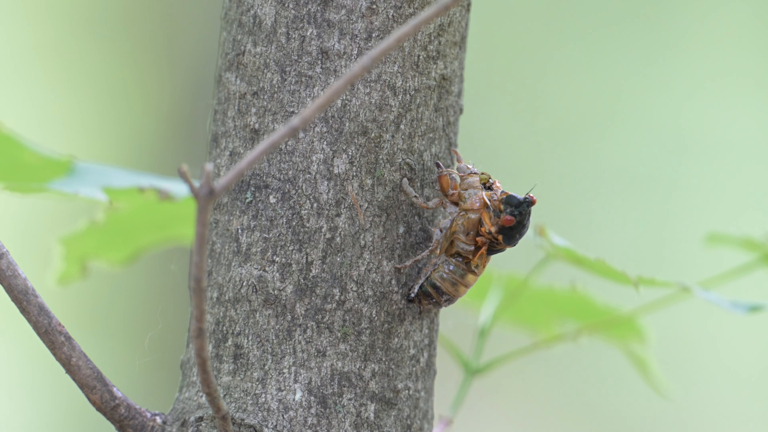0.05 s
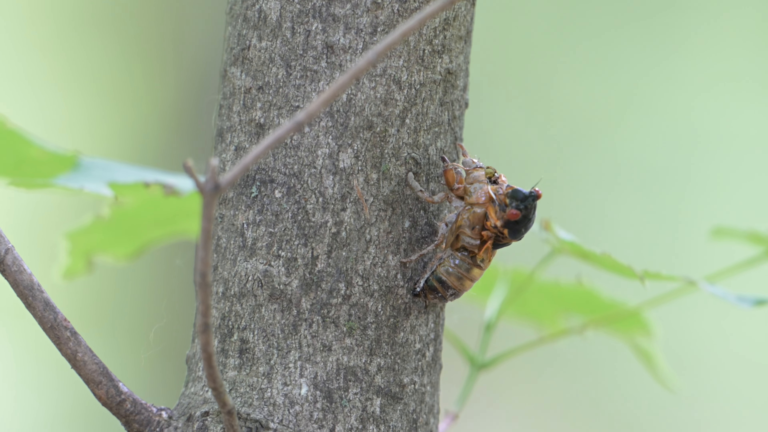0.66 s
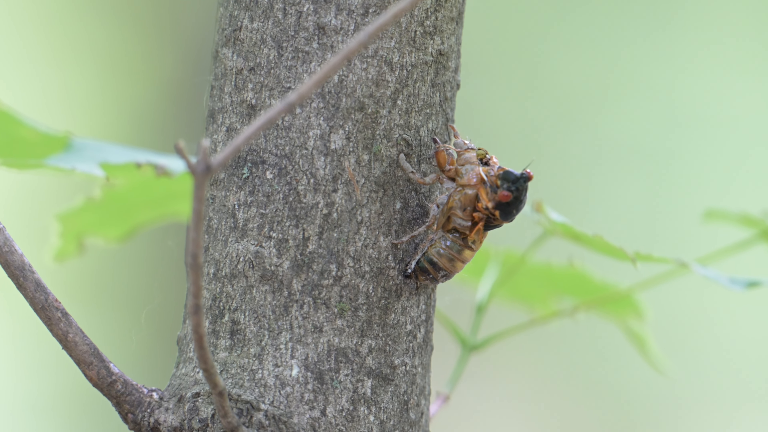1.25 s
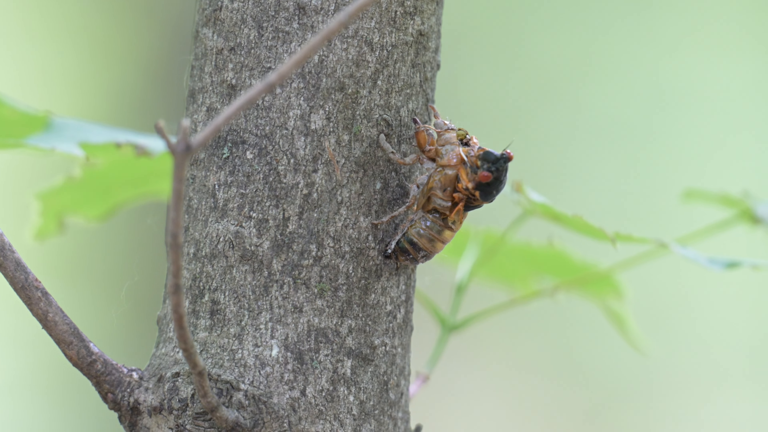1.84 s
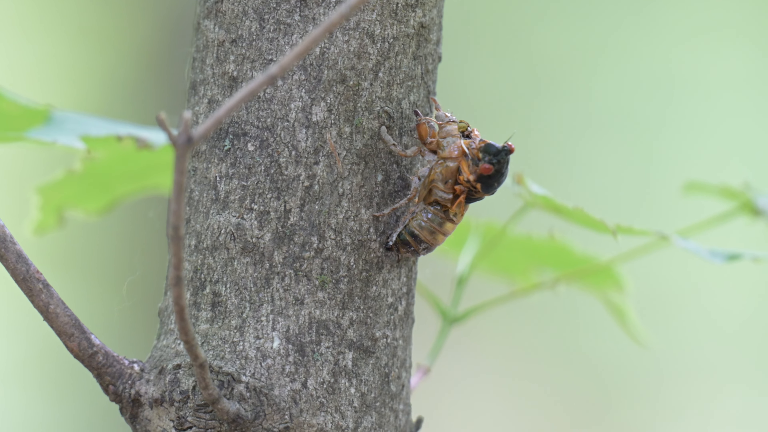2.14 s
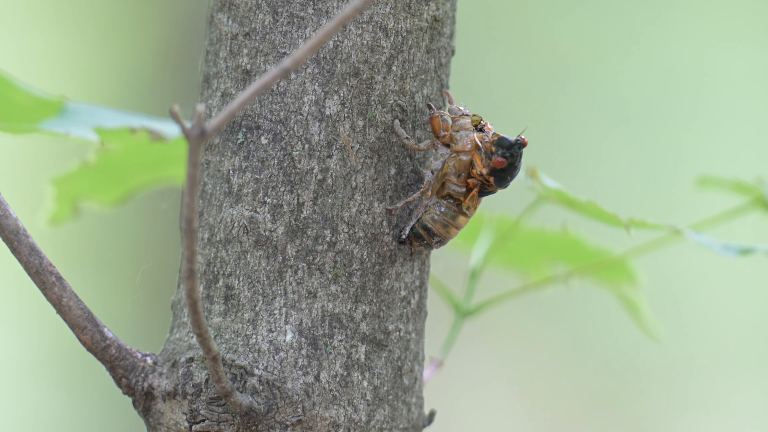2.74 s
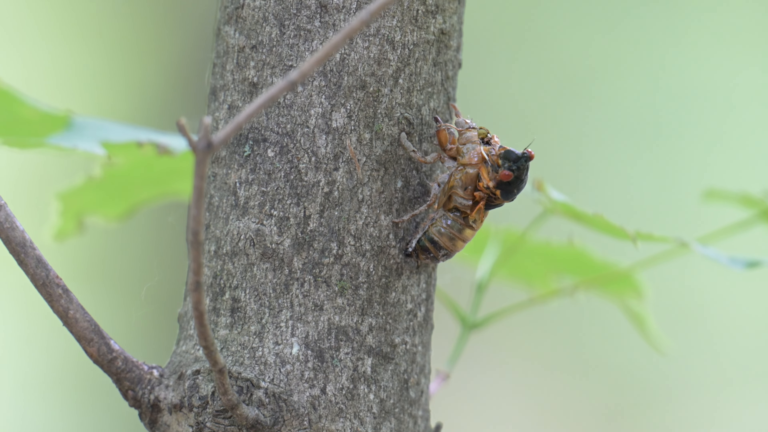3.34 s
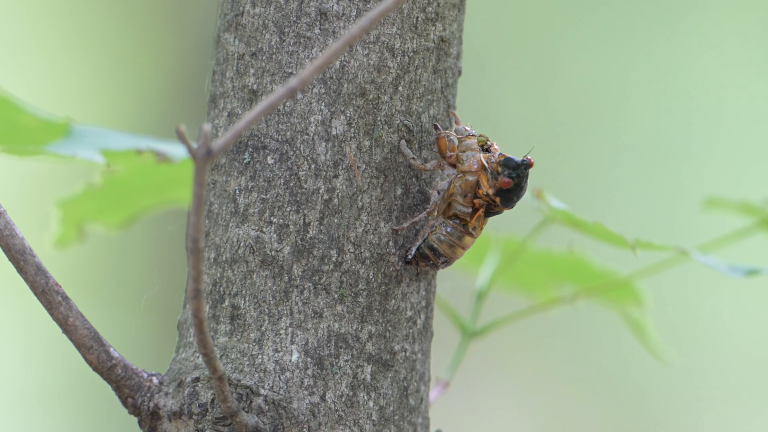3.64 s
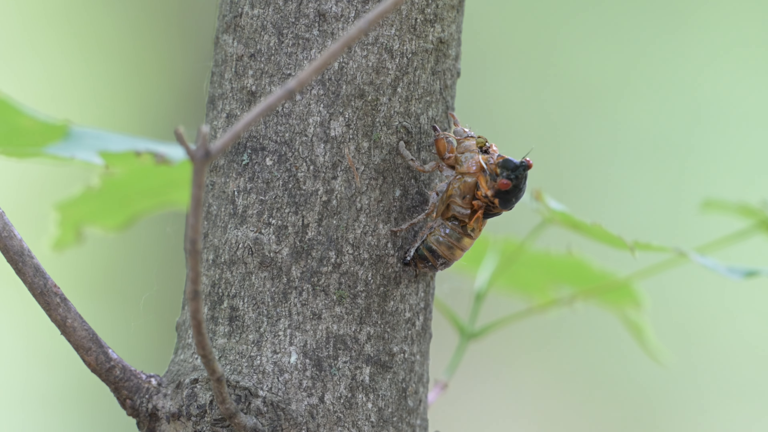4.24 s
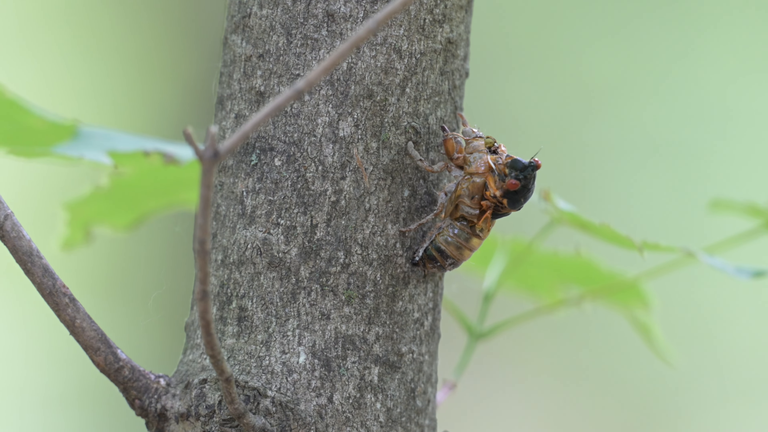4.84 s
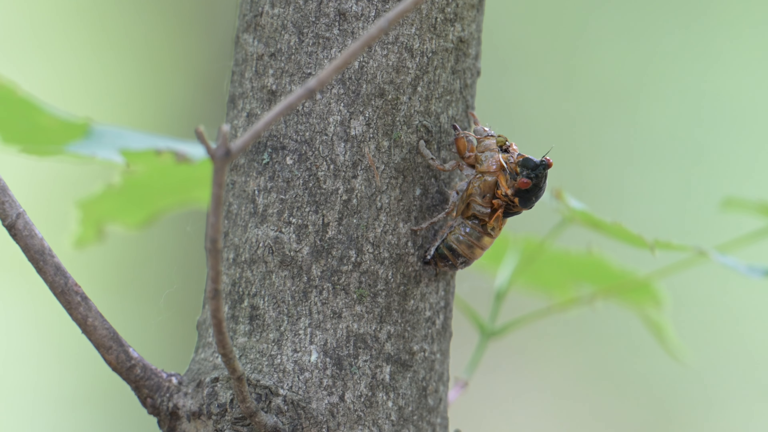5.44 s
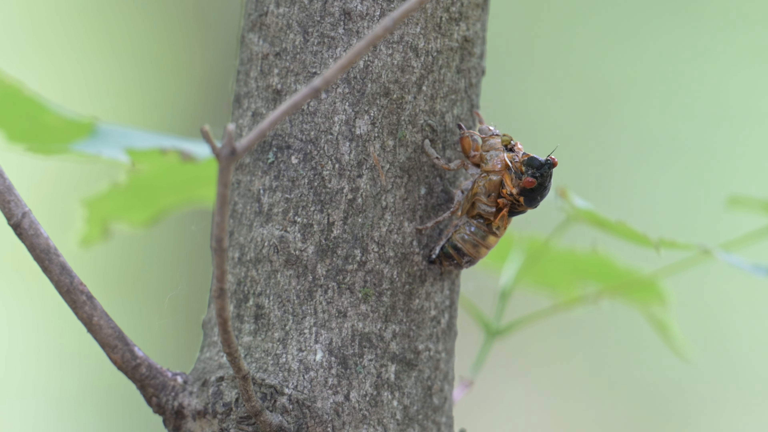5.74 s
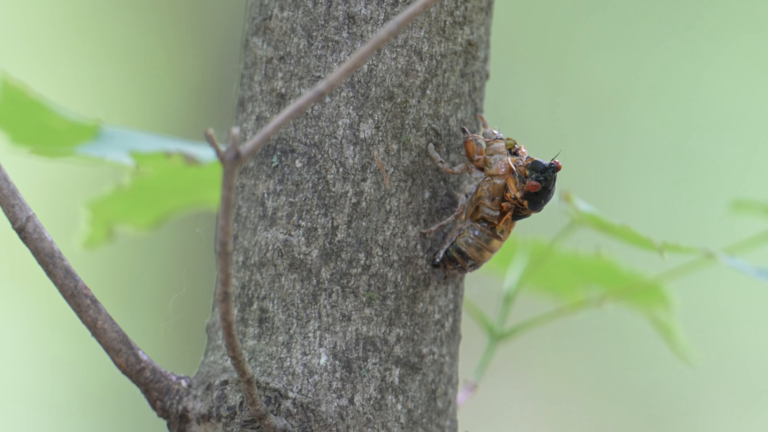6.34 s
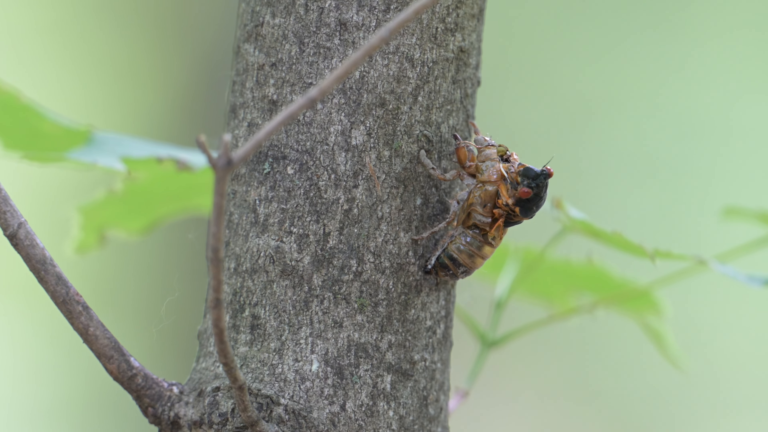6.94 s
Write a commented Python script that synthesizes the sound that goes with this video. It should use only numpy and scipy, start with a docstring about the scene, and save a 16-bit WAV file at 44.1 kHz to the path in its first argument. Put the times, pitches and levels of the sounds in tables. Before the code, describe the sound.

Countless cicadas blend into a loud, wavering hum among trees, with faint high birdsong partway through and a very faint distant engine.

```python
"""From the start, thousands of periodical cicadas blend into one wavering drone in summer woodland,
over a distant engine's low hum and faint, scattered hoots. From 1.6 s to 5 s a small songbird whistles
one phrase of repeated chirps and trills, scattered by the trees. At 1.9 s a low rumble enters and stays.
The drone runs to the end. The microphone is nearly mono; its limiter holds down the drone's crests."""
import sys
import numpy as np
from scipy import signal
from scipy.fft import rfft, irfft, next_fast_len
from scipy.io import wavfile
from scipy.ndimage import uniform_filter1d, minimum_filter1d, map_coordinates

SR = 44100
rng = np.random.default_rng(int(sys.argv[2]) if len(sys.argv) > 2 else 0)


def bounce(signal):
    """Save signal as a 16-bit WAV file at the path given by the first command-line argument."""
    frames = np.transpose(np.atleast_2d(signal))
    limited = np.clip(frames, -1, 1)
    pcm = np.round(limited * 32767).astype(np.int16)
    wavfile.write(sys.argv[1], SR, pcm)


N = 317079

# massed song, held notes at the crest, falling ends in the shelf below: f/Hz, relative density/dB
DRONE_SPECTRUM = [(600, -54.5), (770, -33.5), (870, -19), (1070, -19), (1190, -8.5), (1260, -6),
                  (1335, 0.5), (1380, -1), (1460, -9.5), (1590, -20), (1690, -24), (1850, -35.5),
                  (2300, -44.5), (3200, -72.5)]
# drone's brief, irregular rises and dips in loudness: t/s, level/dB
DRONE_LEVEL = [(0, -16.6), (.3, -17), (.4, -18.8), (.49, -14.2), (.6, -18.2), (1.17, -16.8), (1.6, -18),
               (1.7, -16.7), (3.3, -16.8), (5.1, -17), (5.18, -15.6), (5.86, -18.2), (5.99, -15),
               (6.3, -17.8), (6.54, -15.2), (6.65, -18.8), (6.86, -15.6), (7.19, -18)]
# swarm's rasp, dulled by leaves: f/Hz, relative density/dB
RASP_SPECTRUM = [(700, -21), (1700, 5), (2250, 1), (2720, 0.5), (3200, -7), (3550, -7), (3920, -0.5),
                 (4700, -7), (5800, -12.5), (7500, -16.5), (8900, -16), (10700, -24), (15500, -29)]

def cicadas(near_db=-11, sway_db=.7, sways_per_s=11, rasp_db=-40.7, rasp_sway_db=.6):
    """Far swarm and nearer singers beat together in one swaying drone, a dry rasp above it."""
    level_db, = curves(DRONE_LEVEL)
    drone = steady(wash(DRONE_SPECTRUM) + amp(near_db) * near_cicadas())
    drone *= amp(level_db + sway_db * wobble(sways_per_s))
    rasp = amp(rasp_db + rasp_sway_db * wobble(4)) * wash(RASP_SPECTRUM)
    return drone + rasp


def near_cicadas(count=14, pitch_hz=1345, spread=.025, phrase_s=3.3, fall=.33):
    """Each holds a note, slurs down as its abdomen drops, rests and restarts."""
    t, voices = np.arange(N) / SR, np.zeros(N)
    for start, pace, detune in rng.standard_normal((count, 3)):
        progress = (start + t / (phrase_s * amp(pace))) % 1
        slur = np.clip((progress - .72) / .16, 0, 1)
        effort = np.clip(progress * 10, 0, 1) * (1 - slur) ** 2
        voices += effort * tone(pitch_hz * (1 + spread * detune) * (1 - fall * slur))
    return unit(woods(voices))


# bird's phrase: t/s, syllable, relative level/dB, pitch ratio
BIRD_PHRASE = [(1.56, "peep", 0, 1), (1.681, "swoop", -4, 1.028), (1.914, "swoop", -1, 1),
               (2.142, "swoop", 2.3, 1), (2.401, "cascade", 0, 1), (2.698, "cascade", 0, 1.005),
               (2.998, "cascade", -1, 1.005), (3.327, "flick", .5, 1), (3.502, "flick", -1.5, 1),
               (3.693, "flick", 0, 1), (3.845, "trill", 0, 1), (4.147, "zip", 0, 1),
               (4.153, "trill", -1.5, 1), (4.478, "seesaw", -1, 1), (4.708, "seesaw", .5, 1),
               (4.957, "seesaw", .5, 1)]
# path gains: direct/dB, off nearby leaves/dB, from deeper woods/dB
PATH_GAINS_DB = (-1.1, -7, -7.8)

def bird():
    """One phrase, most syllables sung two or three times, heard direct and off the trees."""
    song = np.zeros(N)
    for start_s, syllable, accent_db, ratio in BIRD_PHRASE:
        for delay_s, length_s, *bend_hz, db in notes(syllable):
            note = whistle(length_s, np.multiply(bend_hz, ratio))
            onset = round((start_s + delay_s) * SR)
            song[onset:][:len(note)] += amp(accent_db + db) * note
    direct, near, far = amp(PATH_GAINS_DB)
    return direct * song + near * leaves(song) + far * woods(song)


# notes per syllable: delay/s, length/s, start f/Hz, middle f/Hz, end f/Hz, level/dB
SYLLABLE_NOTES = { "peep": [(0, .026, 5260, 5200, 5170, -47)], "swoop": [(0, .049, 5920, 6090, 6110, -39),
                  (.071, .02, 7800, 6400, 5650, -40), (.083, .031, 5950, 5280, 4750, -36.5),
                  (.131, .026, 4170, 5100, 5670, -36.5)], "cascade": [(0, .032, 8000, 7600, 7200, -52),
                  (.028, .028, 7250, 6600, 6400, -38.5)], "flick": [(0, .044, 4850, 4300, 3650, -39.2),
                  (.059, .017, 5400, 5750, 7550, -36.5)], "trill": [(0, .055, 6950, 6850, 6550, -48.5),
                  (.05, .035, 6450, 5820, 5650, -38)], "zip": [(0, .013, 9800, 7200, 5460, -40)],
                  "seesaw": [(0, .033, 6720, 6400, 6550, -43.8), (.043, .032, 4350, 4850, 5350, -40.7),
                  (.067, .021, 5300, 4550, 3700, -42.7)]}
# closing runs: same six columns, period/s, pitch ratio per note, loudest index, fade per note/dB
SYLLABLE_RUNS = {"cascade": (.053, .019, 5100, 5600, 6050, -35, .023, .89, 0, 2.9),
                 "trill": (.099, .02, 3750, 5250, 3950, -35.2, .03, 1, 2.3, 3)}

def notes(syllable, run_count=5):
    """A syllable's opening notes, then any run: one note repeated evenly, fading either side of a peak."""
    rows = list(SYLLABLE_NOTES[syllable])
    if syllable in SYLLABLE_RUNS:
        delay_s, length_s, *bend_hz, peak_db, period_s, step, loudest, fade_db = SYLLABLE_RUNS[syllable]
        for k in range(run_count):
            db = peak_db - fade_db * abs(k - loudest)
            rows.append((delay_s + k * period_s, length_s, *np.multiply(bend_hz, step ** k), db))
    return rows


def whistle(length_s, bend_hz, waver=.007, pointed=.7):
    """A pure note swells, bends through three pitches in a pointed arc and fades."""
    progress = np.linspace(0, 1, max(int(length_s * SR), 16))
    arc_hz = np.polyval(np.polyfit([0, .5, 1], bend_hz, 2), progress)
    corner_hz = np.interp(progress, [0, .5, 1], bend_hz)
    pitch_hz = (1 - pointed) * arc_hz + pointed * corner_hz
    flutter = 1 + waver * np.interp(progress, np.linspace(0, 1, 6), rng.standard_normal(6))
    swell = np.abs(np.sin(np.pi * progress)) ** .6
    return swell * tone(pitch_hz * flutter)


def leaves(x, t60_s=.19):
    """Nearby foliage smears a sound into a short diffuse halo."""
    t = np.arange(SR // 4) / SR
    tail = rng.standard_normal(len(t)) * amp(-60 * t / t60_s)
    return signal.fftconvolve(x, tail / np.linalg.norm(tail))[:N]


# woodland decay: f/Hz, t60/s
WOODS_DECAY = [(300, 0.51), (1400, 0.67), (5000, 1.4), (10000, 0.17)]

def woods(x):
    """Trunks and canopy scatter a sound into a tail, longest near 5 kHz; the top treble dies first."""
    hz, t, noise = signal.stft(rng.standard_normal(SR), SR, nperseg=256)
    decay = amp(-60 * t / along(WOODS_DECAY, hz)[:, None])
    tail = signal.istft(noise * decay, SR, nperseg=256)[1]
    return signal.fftconvolve(x, tail / np.linalg.norm(tail))[:N]


# engine tones: t/s, f/Hz, fundamental level/dB, third harmonic level/dB
ENGINE_TONES = [(0, 148, -63, -70), (.7, 149, -65, -58.5), (1.45, 152.5, -54.5, -61.5),
                (1.7, 153, -66, -72), (2.9, 157, -62, -69), (3.3, 157, -55, -61), (4.5, 156.5, -54.5, -70),
                (5.25, 157, -57, -74), (5.6, 156.5, -58, -58), (6.3, 157.5, -55.5, -67),
                (7.19, 155, -57, -75)]

def engine(waver_hz=1, fading_db=.6):
    """A distant engine speeds up slightly; its two tones fade and return."""
    hz, first_db, third_db = curves(ENGINE_TONES)
    hz += waver_hz * wobble(8)
    first = amp(first_db + fading_db * wobble(3.1)) * tone(hz)
    third = amp(third_db + fading_db * wobble(3.1)) * tone(3 * hz)
    return first + third


def rumble(pitch_hz=70, level_db=-66, start_s=1.9, rise_s=.25, fading_db=3, waver_hz=2.5):
    """Far machinery's low rumble comes in and stays."""
    rise = np.clip((np.arange(N) / SR - start_s) / rise_s, 0, 1)
    return rise * amp(level_db + fading_db * wobble(3)) * tone(pitch_hz + waver_hz * wobble(6))


# far machinery: f/Hz, level/dB
MACHINE_HUMS = [(91, -64.5), (102, -69), (309, -69)]

def machinery(fading_db=2, waver_hz=2):
    """Far machines hum throughout, wavering slightly in level and pitch."""
    return sum(amp(db + fading_db * wobble(2)) * tone(hz + waver_hz * wobble(7))
               for hz, db in MACHINE_HUMS)


# faint hoots: t/s, length/s, f/Hz, level/dB
FAR_HOOTS = [(.4, .8, 423, -63), (.85, .35, 612, -59.5), (3.12, .61, 350, -56), (3.15, .31, 368, -57),
             (4.25, .3, 350, -55.5), (6.2, .98, 203, -61.5)]

def hoots(waver_hz=6, echo_db=-10):
    """Soft low tones from far off, blurred by the trees."""
    t, sound = np.arange(N) / SR, np.zeros(N)
    for start_s, length_s, hz, db in FAR_HOOTS:
        progress = np.clip((t - start_s) / length_s, 0, 1)
        sound += amp(db) * np.sin(np.pi * progress) * tone(hz + waver_hz * wobble(25))
    return sound + amp(echo_db) * woods(sound)


# far traffic and air: f/Hz, relative density/dB
AIR_SPECTRUM = [(25, -27), (40, -19), (62, -6), (95, -3), (125, 1.2), (250, 1.5), (450, 2.2), (650, 2),
                (1500, -5), (5000, -42)]

def air(level_db=-50):
    """Far traffic and air blend into a steady murmur."""
    return amp(level_db) * wash(AIR_SPECTRUM)


def amp(db):
    """Decibels to gain."""
    return 10 ** (np.asarray(db) / 20)


def unit(x):
    """x at rms 1."""
    return x / np.sqrt(np.mean(x ** 2) + 1e-20)


def along(points, hz):
    """(f/Hz, value) points read on a log axis."""
    knots_hz, values = np.transpose(points)
    return np.interp(np.log(hz + 1), np.log(knots_hz + 1), values)


def curves(rows):
    """One value per sample for each column after t/s."""
    times_s, *columns = np.transpose(rows)
    return [np.interp(np.arange(N) / SR, times_s, column) for column in columns]


def wobble(knots_per_s):
    """Smooth random curve."""
    knots = rng.standard_normal(int(N * knots_per_s / SR) + 4)
    return map_coordinates(knots, [np.arange(N) * knots_per_s / SR])


def filtered(x, response):
    """x through a gain given as a function of f/Hz."""
    size = next_fast_len(N + SR // 2)
    return irfft(rfft(x, size) * response(np.fft.rfftfreq(size, 1 / SR)), size)[..., :N]


def wash(spectrum):
    """Noise of rms 1 with the given spectral shape."""
    return unit(filtered(rng.standard_normal(N), lambda hz: amp(along(spectrum, hz))))


def tone(hz):
    """Sine of rms 1 on a pitch curve."""
    return np.sqrt(2) * np.sin(2 * np.pi * (np.cumsum(hz) / SR + rng.random()))


def steady(x, window_s=.14):
    """Evens out slow level drift, keeps fast beating."""
    size = int(window_s * SR)
    power = uniform_filter1d(uniform_filter1d(x ** 2, size), size)
    return x / np.sqrt(np.abs(power) + 1e-12)


# stereo spread: f/Hz, side gain/dB
SIDE_GAIN = [(600, -66), (1000, -57), (1350, -31.5), (1700, -49.5), (2400, -62.5), (4400, -37.5),
             (8000, -23)]

def scene(bird_width_db=9):
    """Swarm and bird echoes surround the microphone with a trace of width; the rest is central."""
    song = bird()
    mid = cicadas() + song + engine() + rumble() + machinery() + hoots() + air()
    surround = cicadas() + amp(bird_width_db) * leaves(song)
    side = filtered(surround, lambda hz: amp(along(SIDE_GAIN, hz)))
    return np.array([mid + side, mid - side])


def limiter(x, ceiling=.415, hold_s=.004):
    """Gain dips smoothly around each crest that would pass the ceiling."""
    size = int(hold_s * SR)
    gain = ceiling / np.maximum(np.abs(x).max(axis=0), ceiling)
    return x * uniform_filter1d(minimum_filter1d(gain, size), size)


def record(dry, hiss_db=-65, whine_db=-82, whine_hz=15000, low_cut_hz=50, top_hz=15720):
    """Treble hiss per channel and a thin electronic whine, then limiter, bass roll-off and band limit."""
    hiss = np.array([wash([(1500, -40), (5000, -6.5), (12000, -1.5)]) for channel in dry])
    whine = tone(whine_hz + 25 * wobble(150))
    limited = limiter(dry + amp(hiss_db) * hiss + amp(whine_db) * whine)
    return filtered(limited, lambda hz: hz ** 2 / np.hypot(hz ** 2, low_cut_hz ** 2) * (hz < top_hz))


dry = scene()
out = record(dry)
bounce(out)
```